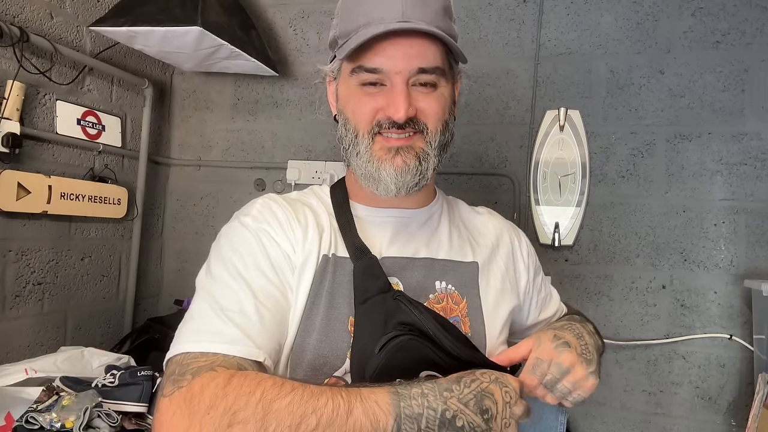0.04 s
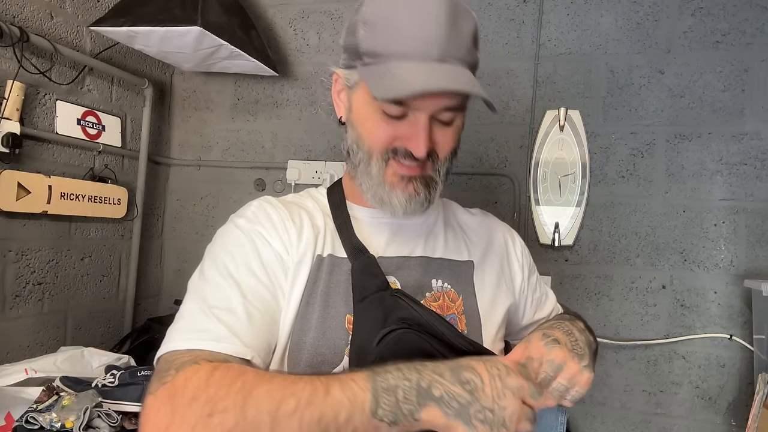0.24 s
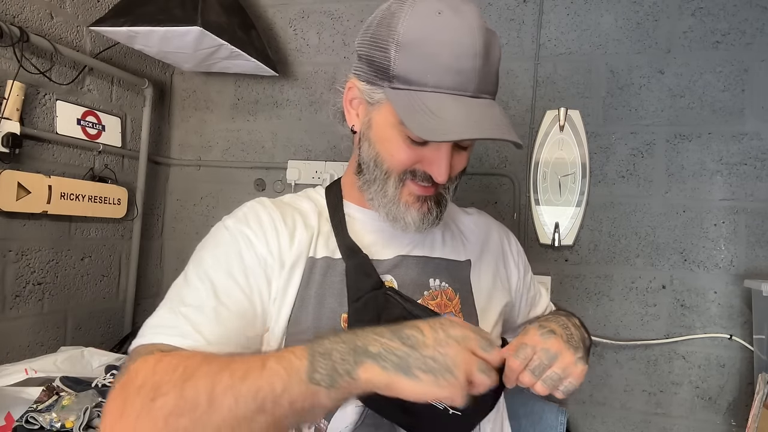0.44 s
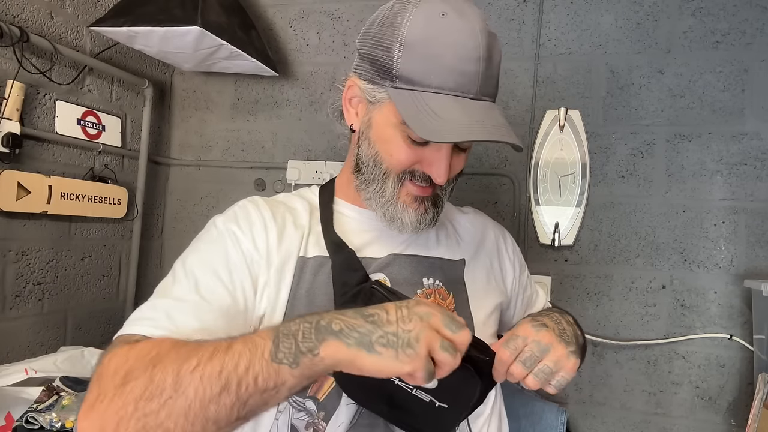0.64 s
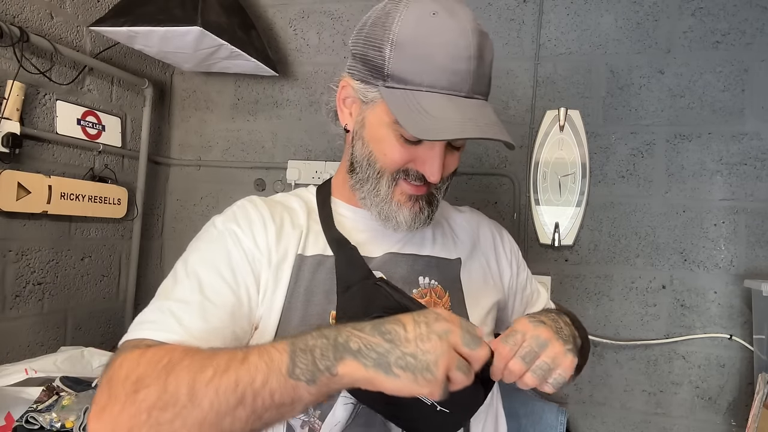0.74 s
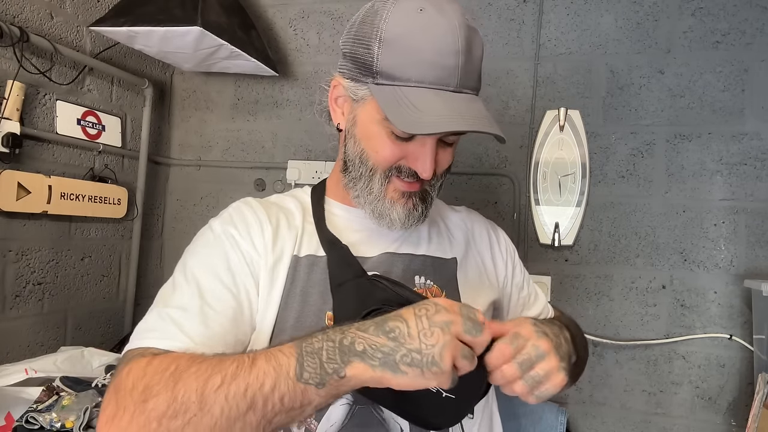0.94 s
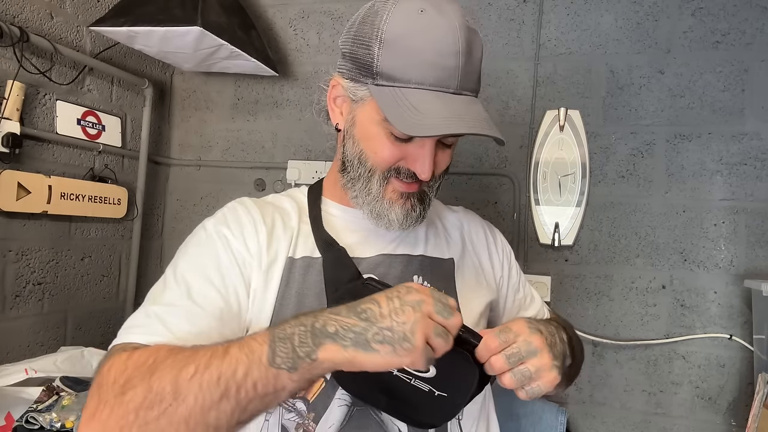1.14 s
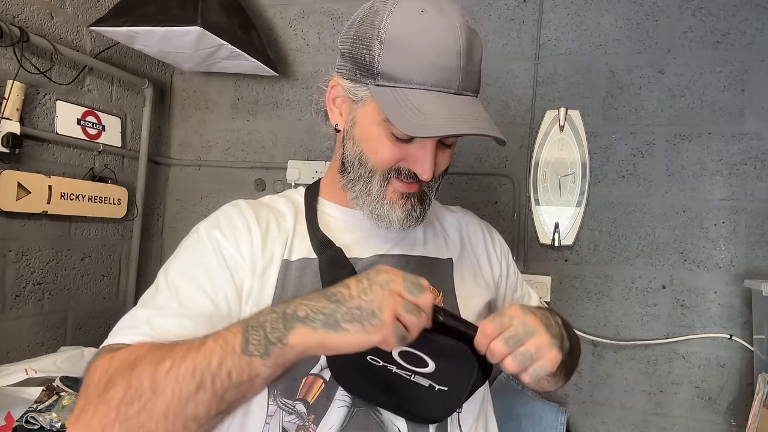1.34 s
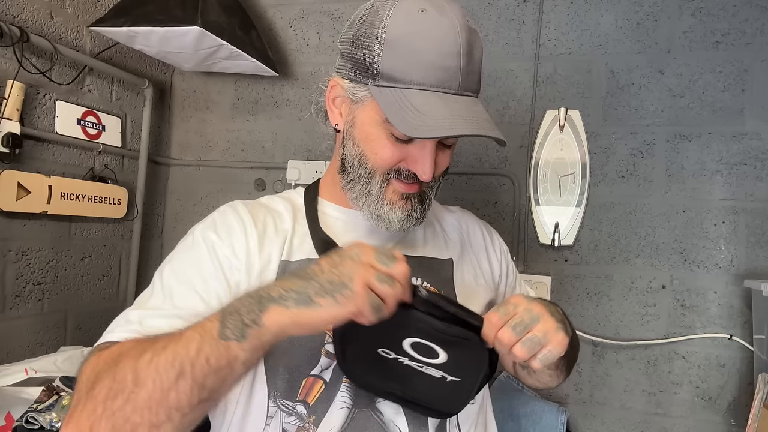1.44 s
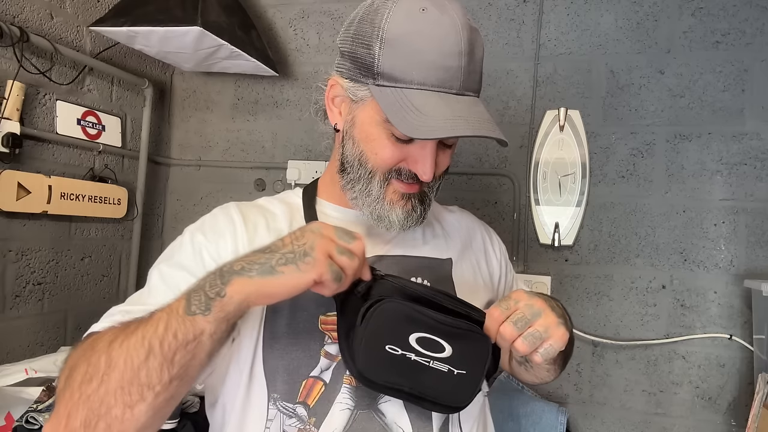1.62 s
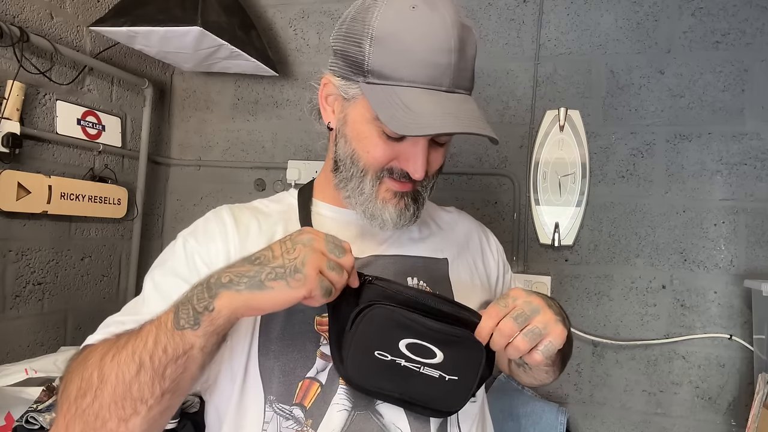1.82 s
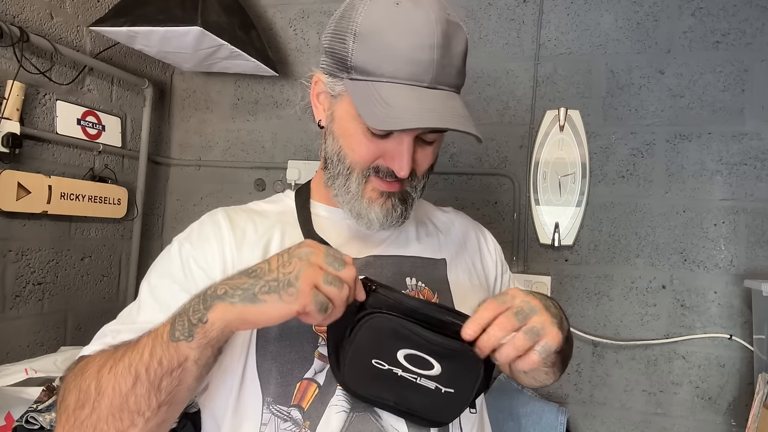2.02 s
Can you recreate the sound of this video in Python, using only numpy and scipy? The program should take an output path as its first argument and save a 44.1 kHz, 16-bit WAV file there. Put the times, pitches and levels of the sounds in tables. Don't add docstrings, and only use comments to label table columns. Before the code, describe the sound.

Zip on a fabric bag pulled by hand: a short rasp, fumbling clicks, then a longer buzzing pull

```python
import sys
import numpy as np
from scipy import signal
from scipy.fft import rfft, irfft
from scipy.io import wavfile
from scipy.ndimage import uniform_filter1d

SR = 44100
rng = np.random.default_rng(int(sys.argv[2]) if len(sys.argv) > 2 else 0)


def waveform_to_disk(signal):
    frames = np.transpose(np.atleast_2d(signal))
    scaled = np.clip(frames, -1, 1) * 32767
    samples = np.round(scaled).astype(np.int16)
    wavfile.write(sys.argv[1], SR, samples)


def voltage_ratio(level):
    return 10 ** (np.asarray(level, float) / 20)


N = 91463


def evened(x):
    return x / np.sqrt(np.mean(x ** 2) + 1e-20)


def read(points, hz):
    f, value = np.transpose(points)
    return np.interp(np.log(hz + 1), np.log(f + 1), value)


def colour(x, points):
    n = x.shape[-1]
    gain = voltage_ratio(read(points, np.fft.rfftfreq(n, 1 / SR)))
    return irfft(rfft(x) * gain, n)


def resonate(x, hz, width_hz):
    turn = np.exp(2j * np.pi * np.cumsum(hz * np.ones(len(x))) / SR)
    r = np.exp(-np.pi * width_hz / SR)
    return (turn * signal.lfilter([1], [1, -r], x / turn * -1j)).real


def thud(x, hz, width_hz):
    twice = resonate(resonate(x, hz, width_hz), hz, width_hz)
    return twice * 2 * np.e * np.pi * width_hz / SR


def decay(clicks, t60_s):
    return signal.lfilter([1], [1, -voltage_ratio(-60 / (t60_s * SR))], clicks)


# freq_hz, density_db
AIR_SPECTRUM = [(35, -49), (60, -12), (150, -8.5), (500, -7), (1500, -11.5), (4000, -22.5), (15500, -38)]
# time_s, rumble_db
HANDLING_LEVEL = [(0.0, -71), (0.07, -62), (0.14, -97), (0.34, -69), (0.37, -80), (0.43, -62.5),
                  (0.64, -80), (0.81, -68), (1.04, -79), (1.07, -65), (1.19, -75), (1.26, -59.5),
                  (1.7, -66), (1.84, -82), (2.01, -73.5), (2.07, -77)]
# freq_hz, density_db
RUMBLE_SPECTRUM = [(35, -30), (65, 11), (90, -0.5), (140, -4.5), (220, -29)]


def air():
    n = rng.standard_normal((4, N))
    tone = voltage_ratio(-67.5) * evened(colour(n[0] + 1.5 * n[1:3], AIR_SPECTRUM))
    hum = voltage_ratio(-78) * evened(resonate(n[0], hz=62.7, width_hz=9.7))
    rumble = evened(colour(n[3] + 0.3 * n[1:3], RUMBLE_SPECTRUM))
    rumble_db = np.interp(np.arange(N) / SR, *np.transpose(HANDLING_LEVEL))
    return tone + hum + voltage_ratio(rumble_db) * rumble


# start_s, rise_s, fade_s, level_db, brightness_db
HAND_RUSTLES = [(.0, 0.025, 0.037, -68.5, 5.5), (0.053, 0.0085, 0.042, -60, 5.5),
                (.08, 0.049, 0.87, -75, 4.5), (0.491, 0.0023, 0.03, -62.5, -3),
                (0.576, 0.0027, 0.03, -61, 1), (0.658, 0.018, 0.17, -79.5, 5),
                (0.756, 0.0074, 0.04, -58, -3), (0.798, 0.03, 0.057, -64, -1.5),
                (0.938, 0.029, 0.1, -63.5, 2.5), (1.036, 0.0046, 0.046, -65, 6),
                (1.05, 0.061, 0.12, -63, 8.5), (1.701, 0.063, 0.043, -69.5, -1.5),
                (1.906, 0.044, 0.06, -63, 0.5)]
# start_s, rise_s, fade_s, level_db
TAPE_HISS = [
    (.25, 0.11, 0.17, -49.5),
    (1.166, 0.26, 0.22, -42.5),
    (1.551, 0.064, 0.089, -45),
]
# freq_hz, density_db
CLOTH_SPECTRUM = [(60, 1), (150, -9.5), (350, -0.5), (750, 3.5), (1500, -12), (3000, -15), (8000, -17.5),
                  (15500, -23)]


def cloth():
    t = np.arange(N) / SR
    grains_per_s, spread_db, grain_share = 2000, 3, 0.5
    size = voltage_ratio(spread_db * np.minimum(rng.exponential(1, N), 3))
    grains = decay(size * (rng.random(N) < grains_per_s / SR), t60_s=0.002)
    grains = evened(grains * rng.standard_normal((3, N)))
    hiss = rng.standard_normal((3, N))
    rub = colour(grain_share * grains + (1 - grain_share) * hiss, CLOTH_SPECTRUM)
    dull = colour(rub, [(1500, 0), (2200, -6), (4000, -40)])
    bright = colour(rub, [(1000, -40), (2200, -6), (3000, 0)])
    strokes = HAND_RUSTLES + [(s, rise, fade, db - 12, 12) for s, rise, fade, db in TAPE_HISS]
    out = np.zeros((3, N))
    for start_s, rise_s, fade_s, level_db, bright_db in strokes:
        u = t - start_s - rise_s
        rise = np.clip(1 + u / rise_s, 0, 1) ** 2
        shape = np.where(u < 0, rise, np.exp(-2 * (u / fade_s) ** 2))
        out += voltage_ratio(level_db) * shape * (dull + voltage_ratio(bright_db) * bright)
    return out / np.std(rub)


# time_s, tick_db, ring_4900hz_db, ring_5400hz_db, ring_11khz_db
TAB_STRIKES = [
    (0.0585, -46, -58, -62, -58),
    (0.0823, -40, -52, -56, -50),
    (0.3747, -36, -58, -52, -40),
    (1.0455, -27, -48, -46, -44),
    (1.5328, -26, -52, -50, -32),
    (1.6035, -40, -40, -52, -42),
    (1.6148, -38, -33, -46, -40),
    (1.6445, -27, -40, -27, -36),
    (1.6706, -38, -52, -40, -48),
]
# freq_hz, level_db, t60_s
TAB_MODES = [(4850, 0, .022), (5400, 0, .012), (10200, -10, .02), (11060, 0, .02)]
# start_s, end_s, low_modes_db, high_modes_db
LOOSE_BUZZ = [
    (.0, 0.102, -53.5, -62),
    (1.525, 1.565, -47, -54),
    (1.584, 1.665, -39.5, -53),
]
# time_s, tick_db
SLIDER_CLACKS = [
    (0.4027, -28.5),
    (0.7584, -36),
    (1.21, -34),
    (1.221, -34),
    (1.129, -40),
    (1.147, -36),
    (1.174, -40),
    (1.3274, -34),
]


def tab():
    t = np.arange(N) / SR
    hits, ticks = np.zeros((len(TAB_MODES), N)), np.zeros(N)
    for s, tick_db, low_db, mid_db, high_db in TAB_STRIKES:
        hits[:, round(s * SR)] = voltage_ratio([low_db, mid_db, high_db, high_db])
        ticks[round(s * SR)] = voltage_ratio(tick_db)
    for s, tick_db in SLIDER_CLACKS:
        ticks[round(s * SR)] = voltage_ratio(tick_db)
    buzz_per_s = 290
    taps = (rng.random(N) < buzz_per_s / SR) * rng.standard_normal((len(TAB_MODES), N))
    for start_s, end_s, low_db, high_db in LOOSE_BUZZ:
        force = voltage_ratio([[low_db], [low_db - 17], [high_db], [high_db]])
        hits = hits + force * ((t >= start_s) & (t < end_s)) * taps
    low_tuning = np.where(t < 0.2, 1.055, 1)
    ring = np.zeros(N)
    for hit, (hz, db, t60_s) in zip(hits, TAB_MODES):
        tuned_hz = hz * (low_tuning if hz < 5000 else 1)
        ring += voltage_ratio(db) * resonate(hit, tuned_hz, 2.2 / t60_s)
    click = evened(colour(rng.standard_normal(N), [(2000, -6), (5000, 14), (15000, -1)]))
    tick = decay(ticks, t60_s=0.022) * click
    return voltage_ratio(-1.5) * ring + voltage_ratio(-11.5) * tick


# time_s, teeth_hz, force_db, bag_hz
RASP = [
    (.278, 152.1, -47, 460),
    (.304, 189.7, -45.5, 730),
    (.34, 231.5, -39, 816),
    (.37, 259.4, -42.5, 740),
    (0.385, 265.6, -39.5, 770),
    (0.397, 158.8, -45.5, 740),
    (.418, 134, -42.5, 640),
    (.43, 115, -88, 606),
]
LONG_PULL_START = [
    (1.399, 255.7, -34.5, 546),
    (1.425, 322, -40.5, 710),
    (1.437, 398.2, -36.5, 840),
    (1.476, 343.8, -38.5, 730),
]
LONG_PULL_END = [
    (1.475, 340.5, -30, 730),
    (1.494, 245.5, -34, 520),
    (1.514, 239.4, -37.5, 447),
    (1.525, 266.4, -36.5, 583),
    (1.541, 200, -42.5, 494),
    (1.558, 156.3, -42, 464),
    (1.587, 148.4, -43, 600),
    (1.601, 247.6, -40.5, 800),
    (1.619, 247, -37, 790),
]
# jitter_teeth, spread_db, drone_db
PULL_EVENNESS = [
    (.03, 3, 6),
    (.012, 1, -7),
    (.015, 1.2, -4),
]
# time_s, peak_db, bag_hz, snap_db
SLOW_TEETH = [(0.251, -38.5, 810, -19), (0.271, -42, 418, -10), (0.441, -34.5, 780, -28),
              (0.458, -34, 610, -11.5), (0.494, -40, 630, -3.5), (0.576, -41.5, 705, -5.5),
              (0.946, -56.5, 680, -30), (0.956, -51, 698, -38), (0.988, -75, 790, -30),
              (1.011, -45, 834, -18), (1.029, -66, 720, -25), (1.036, -45, 670, -26),
              (1.045, -47, 730, -24), (1.071, -41, 616, -24), (1.089, -42, 800, -10),
              (1.108, -41.5, 690, -18), (1.129, -36.5, 650, -16), (1.147, -39, 835, -46),
              (1.172, -36.5, 636, -18),
              (1.213, -39.5, 805, -11), (1.221, -37, 590, -12.5), (1.232, -42.5, 560, -4.5),
                (1.247, -39.5, 650, -7.5), (1.256, -37.5, 720, -15), (1.265, -38.5, 600, -6),
                (1.279, -41, 745, -9), (1.291, -38.5, 690, -8.5), (1.304, -41, 800, -8),
                (1.317, -40.5, 790, -20), (1.327, -33.5, 800, -13.5), (1.337, -35.5, 840, -8.5),
                (1.345, -36.5, 790, -31), (1.353, -35.5, 740, -16), (1.361, -34.5, 645, -19),
                (1.372, -35.5, 770, -22), (1.379, -35.5, 760, -29), (1.385, -35, 666, -18),
                (1.391, -34.5, 650, -20)]
TEETH_CATCHING = [
    (.3085, -37, 880, -22),
    (.3765, -36, 780, -25),
    (.383, -35, 850, -25),
    (.389, -38, 900, -22),
    (.404, -38, 700, -18),
    (.421, -38, 600, -22),
    (1.521, -29, 560, -28),
]
FINAL_TEETH = [
    (1.5925, -33, 720, -26),
    (1.6265, -30, 800, -28),
    (1.6402, -31.5, 760, -28),
    (1.652, -29, 790, -28),
    (1.668, -35, 700, -18),
]


def slider():
    t = np.arange(N) / SR
    knocks, snaps, drone, bag = np.zeros(N), np.zeros(N), np.zeros(N), []
    pulls = (RASP, LONG_PULL_START, LONG_PULL_END)
    for pull, (jitter_teeth, spread_db, drone_db) in zip(pulls, PULL_EVENNESS):
        s, teeth_hz, force_db, bag_hz = np.transpose(pull)
        rate_hz = np.interp(t, s, teeth_hz, 0, 0)
        moving = rate_hz > 0
        force = voltage_ratio(1 + np.interp(t, s, force_db))
        wobble = evened(uniform_filter1d(rng.standard_normal(N), size=120))
        teeth = np.cumsum(rate_hz) / SR + jitter_teeth * wobble
        passed = np.diff(np.floor(np.maximum.accumulate(teeth)), prepend=0) * moving
        size = passed * force * voltage_ratio(spread_db * rng.standard_normal(N)) * np.sqrt(400 / (rate_hz + 1))
        knocks += size
        snaps += size * voltage_ratio(-20.5)
        drone += voltage_ratio(drone_db) * uniform_filter1d(force * moving, size=300) * np.sin(2 * np.pi * teeth)
        bag += list(zip(s, bag_hz))
    rebound_s, rebound_db = 0.0042, -5
    for s, peak_db, bag_hz, snap_db in SLOW_TEETH + TEETH_CATCHING + FINAL_TEETH:
        knocks[round(s * SR)] += voltage_ratio(peak_db + 0.5)
        knocks[round((s + rebound_s) * SR)] += voltage_ratio(peak_db + 0.5 + rebound_db)
        snaps[round(s * SR)] += voltage_ratio(peak_db + snap_db)
        bag += [(s, bag_hz * 1.045), (s + 0.0089, bag_hz * 0.95)]
    return knocks, snaps, drone, np.interp(t, *np.transpose(sorted(bag)))


# freq_hz, width_hz, level_db
TAPE_MODES = [(277, 123, -20.5), (1065, 390, -15), (1530, 730, -14), (2650, 1300, -20.5)]
# freq_hz, width_hz, level_db
SHELL_MODES = [(2540, 240, -7), (2740, 240, 2.5), (3570, 270, -6)]
# freq_hz, width_hz, level_db
WALL_MODES = [(1180, 130, -17), (1600, 150, -17)]
# freq_hz, density_db
SNAP_SPECTRUM = [(2500, 3), (5000, 4), (9000, -8), (15500, -22)]


def zip_teeth():
    t = np.arange(N) / SR
    knocks, snaps, drone, bag_hz = slider()
    scrape = voltage_ratio(-22.5) * decay(knocks, t60_s=0.045) * rng.standard_normal(N)
    bag_width_hz = 270
    out = voltage_ratio(-2.5) * thud(knocks + 0.2 * scrape, bag_hz, bag_width_hz)
    out += voltage_ratio(-20.5) * thud(knocks + scrape, 2.13 * bag_hz, 2 * bag_width_hz)
    free = (t > 0.45) & (t < 0.63)
    shell = decay(snaps, t60_s=0.13) * np.where(free, 1, voltage_ratio(-12.5)) / 12
    for hz, width_hz, db in SHELL_MODES + WALL_MODES:
        out += voltage_ratio(db) * resonate(shell * rng.standard_normal(N), hz, width_hz)
    for k, (hz, width_hz, db) in enumerate(TAPE_MODES):
        out += (-1) ** k * voltage_ratio(db) * thud(knocks + scrape, hz, width_hz)
    bag_floor_hz = 170
    out = signal.sosfilt(signal.butter(4, bag_floor_hz, "high", fs=SR, output="sos"), out)
    out += voltage_ratio(-13) * evened(resonate(drone, hz=242, width_hz=160)) * np.std(drone)
    hiss = evened(colour(rng.standard_normal((3, N)), [(1000, 9)] + SNAP_SPECTRUM))
    return out, decay(snaps, t60_s=0.016) * hiss


def tail(x, t60, start):
    taps = np.zeros((2, SR // 2))
    at = np.arange(start, SR // 2 - 20, 20)
    places = at + rng.integers(0, 20, (2, len(at)))
    np.put_along_axis(taps, places, rng.choice([-1., 1.], (2, len(at))), 1)
    hz, t, z = signal.stft(taps, SR, nperseg=128)
    out = signal.istft(z * voltage_ratio(-60 * t / read(t60, hz)[:, None]), SR, nperseg=128)[1]
    return signal.fftconvolve(x[None], out / np.linalg.norm(out[0]), axes=1)[:, :N]


# freq_hz, phase_rad
PORT_LAG = [(0, 0), (1600, -.65), (3300, -2), (5600, -3), (7000, -3.1), (9500, -2.1), (12000, -.1),
            (16000, 0)]
# freq_hz, level_db
PORT_LEAN = [(60, 1), (200, -1.5), (400, -3.5), (1300, -1.5), (4400, -1), (8000, 2), (15000, 0)]


def ports(x):
    hz = np.fft.rfftfreq(N, 1 / SR)
    phase = np.interp(hz, *np.transpose(PORT_LAG))
    half = voltage_ratio(read(PORT_LEAN, hz) / 2) * np.exp(0.5j * phase)
    return irfft(rfft(x) * np.array([half, 1 / half]), N)


# freq_hz, t60_s
ROOM_DECAY = [(200, 0.16), (1000, 0.12), (8000, 0.11)]
# freq_hz, level_db
HISS_APART = [(100, -18), (1000, 4.5), (3000, 2), (8000, 0.5), (11000, -13)]


def scene():
    body, snap = zip_teeth()
    hiss = snap + cloth()
    bag = body + tab() + hiss[0]
    near = colour(tail(body, [(500, 0.044)], start=40), [(2000, 1), (5000, -7)])
    room = colour(tail(bag, ROOM_DECAY, start=300), [(1000, 0), (6000, 2.5), (11000, 0)])
    direct = ports(bag) + colour(hiss[1:], HISS_APART)
    return direct + voltage_ratio(-14) * near + voltage_ratio(-12.5) * room + air()


def band_limit(x):
    return signal.sosfilt(signal.butter(12, 16650, fs=SR, output="sos"), x)


def record(dry):
    gate_db, slope, depth_db, edge_hz = -65.5, 7.7, -8.5, 15850
    upper = colour(dry, [(120, -60), (220, 0)])
    power = abs(uniform_filter1d((upper ** 2).mean(0), size=900))
    level_db = 10 * np.log10(power + 1e-12)
    gain_db = np.clip(slope * (level_db - gate_db), depth_db, 0)
    gated = dry + upper * (voltage_ratio(gain_db) - 1)
    edge = signal.firwin(255, edge_hz, window=("kaiser", 4), fs=SR)
    return band_limit(signal.oaconvolve(gated, edge[None], "same"))


dry = scene()
out = record(dry)
waveform_to_disk(out)
```